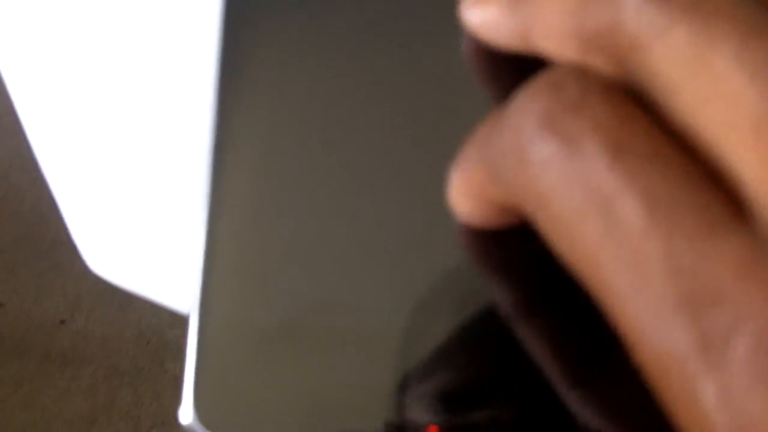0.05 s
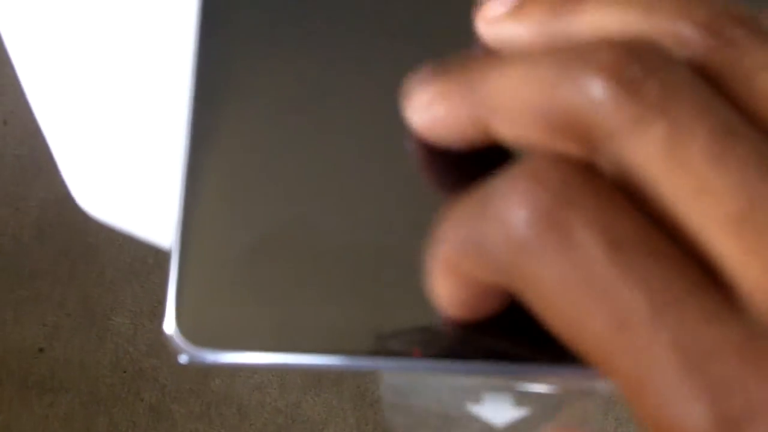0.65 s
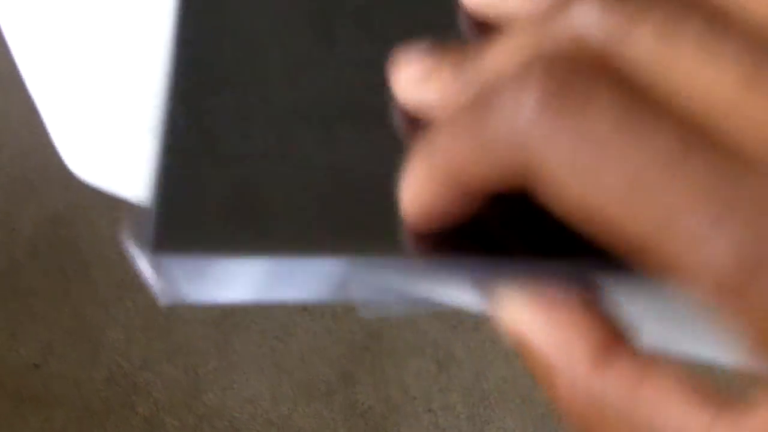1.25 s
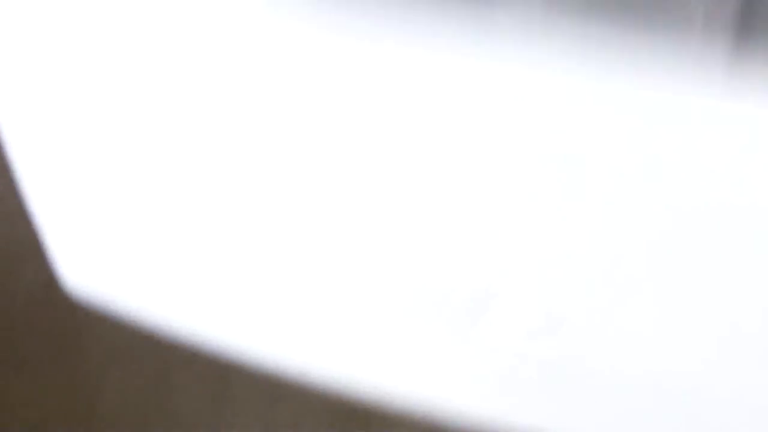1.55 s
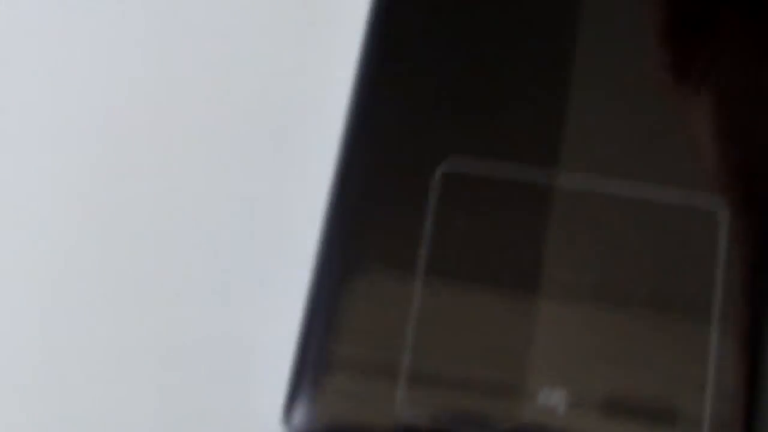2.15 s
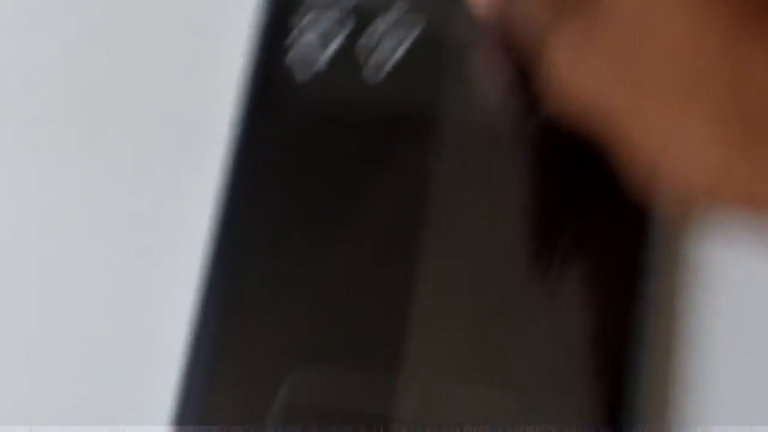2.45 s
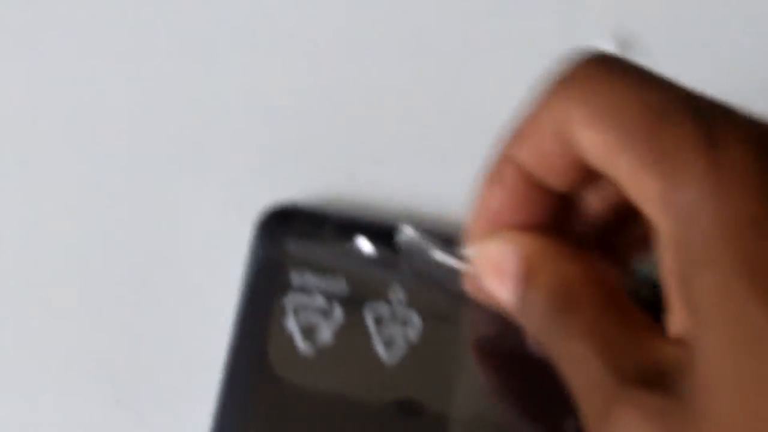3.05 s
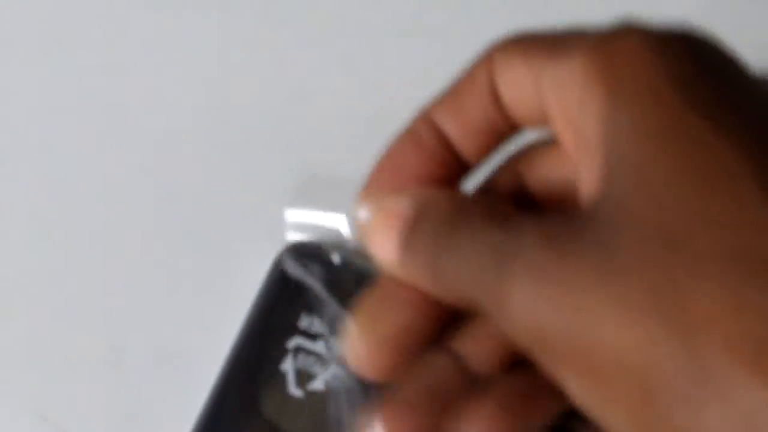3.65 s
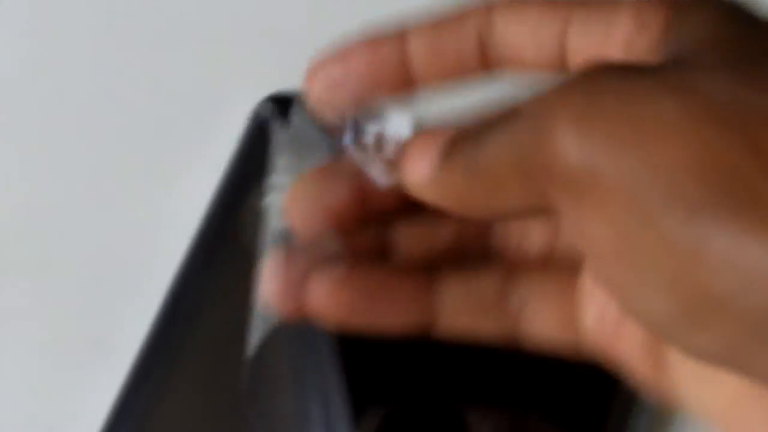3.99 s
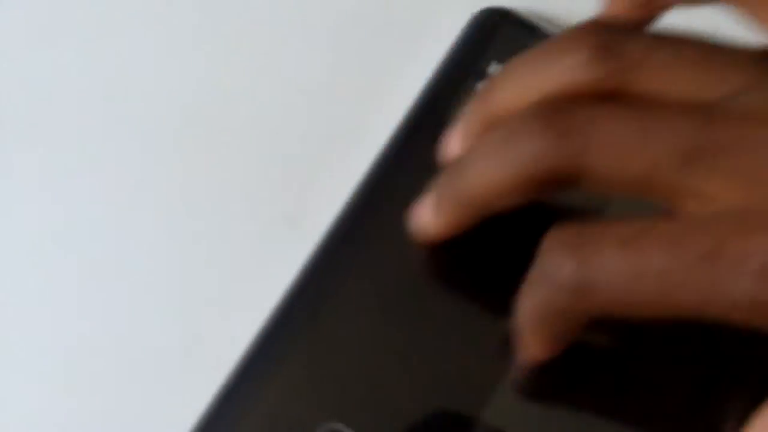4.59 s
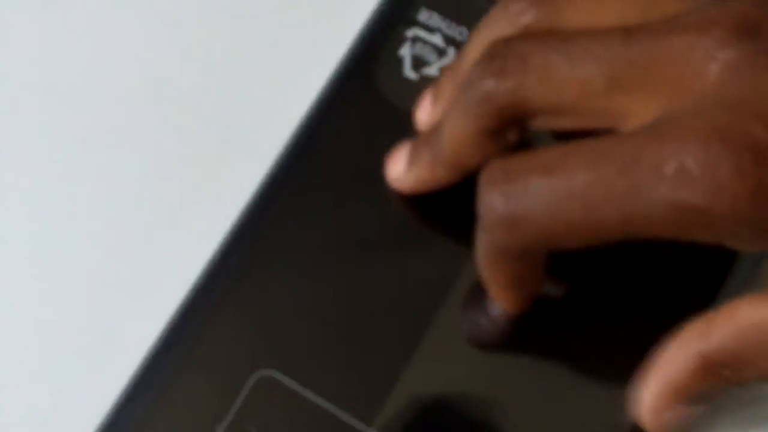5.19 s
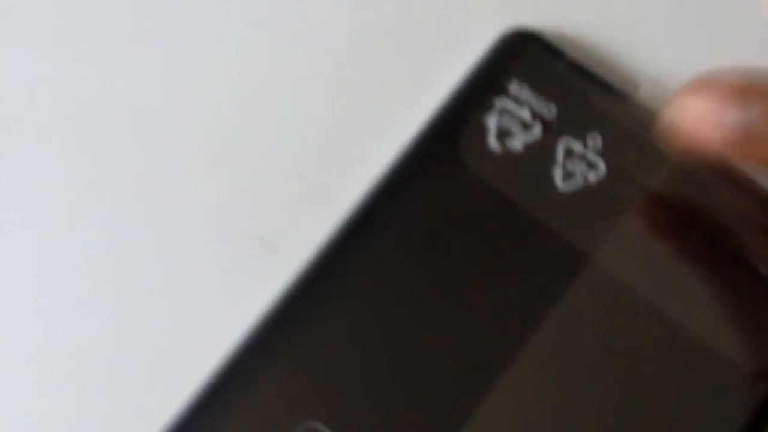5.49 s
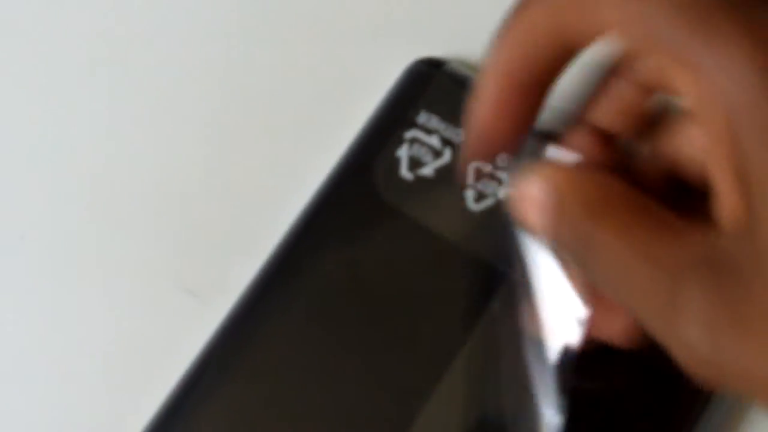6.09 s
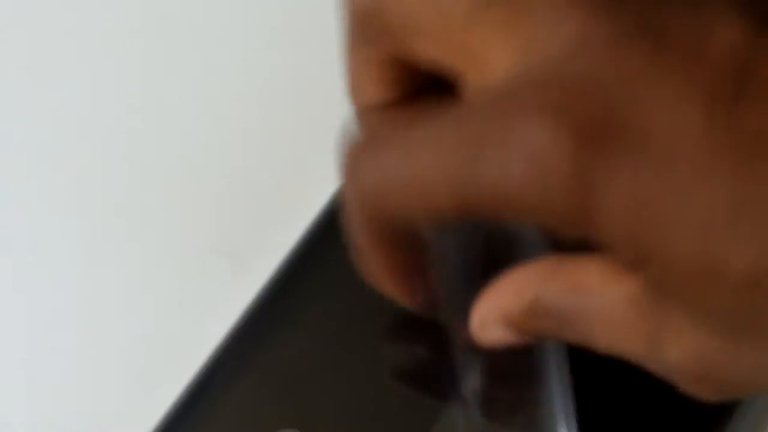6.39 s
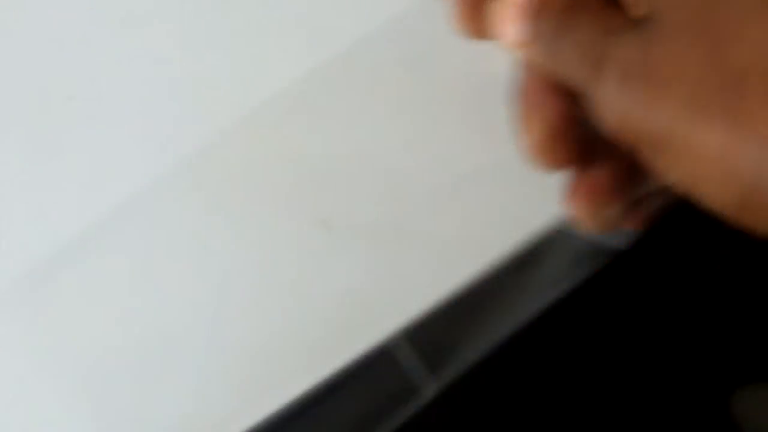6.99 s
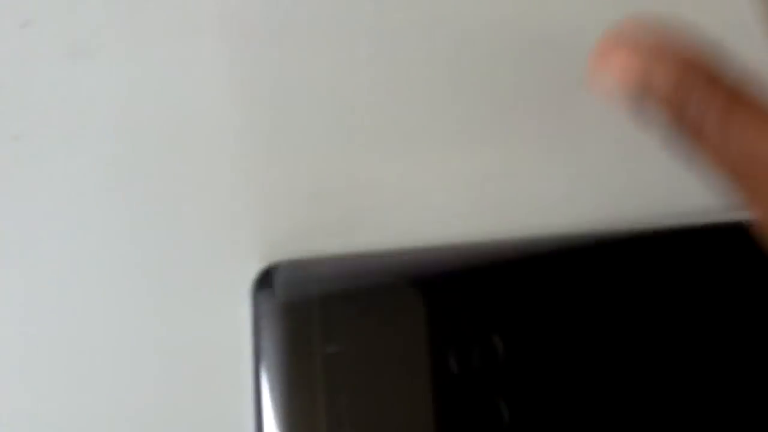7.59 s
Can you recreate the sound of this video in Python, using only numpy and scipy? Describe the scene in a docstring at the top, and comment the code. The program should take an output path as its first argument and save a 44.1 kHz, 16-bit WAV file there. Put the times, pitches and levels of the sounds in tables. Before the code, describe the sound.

Fingers brush and pick at protective plastic film on a tablet, close to a hand-held microphone in a small room. The tablet slides briefly over a table and is set down with a ringing knock. The film snaps and crackles in sharp, irregular clusters, and its tab comes free with a short dry rip. Near the end the film peels off the glass in a quick run of bright ticks, over a faint handling rumble.

```python
"""Protective film is picked and peeled off a glass-fronted tablet, close to a hand-held camera in a small room.
Over a bed of handling rumble, fingers brush and rub the film, and its creases snap as they buckle.
At 1.5 s the tablet slides over the table; at 2.2 s it is set down with a ringing knock. At 3.5 s the
pull tab rips free, then loose film scrapes over the edge between more snaps. Around 7 s the glue lets go
in runs of bright stick-slip ticks, and a few last creases crack."""
import sys
import numpy as np
from scipy import signal
from scipy.fft import rfft, irfft
from scipy.io import wavfile

SR = 44100
rng = np.random.default_rng(int(sys.argv[2]) if len(sys.argv) > 2 else 0)


def int16_out(signal):
    """Quantize to a 16-bit WAV file."""
    q = np.round(np.clip(np.atleast_2d(signal).T, -1, 1) * 32767)
    wavfile.write(sys.argv[1], SR, q.astype(np.int16))


N = 345744
TIME = np.arange(N) / SR

# EQ curves of the bed: swaying camera, skin on its case, skin grazing the film (f/Hz, level/dB)
RUMBLE_EQ = [(8, -3.5), (19, 7.5), (33, -4), (46, -11), (60, -27), (120, -62.5)]
GRIP_EQ = [(40, 1), (75, 2.5), (160, -4.5), (400, -10.5), (1300, -30), (5000, -42.5)]
HISS_EQ = [(300, -1), (1300, 0.5), (3500, -9.5), (4700, -9), (6300, 0), (9000, -10), (12500, -11),
           (14500, -27.5)]
# EQ curves of the fingers: smooth glide, crisp rustle, nail tap (f/Hz, level/dB)
BRUSH_EQ = [(3000, -34), (4800, -17), (6000, 1), (7500, 0), (9500, -9), (13000, -22)]
RUSTLE_EQ = [(3000, -19), (4700, -8), (5600, 3), (6700, 1.5), (9000, -12.5), (12500, -26.5), (15000, -23.5)]
TAP_EQ = [(250, -11.5), (700, 11), (2000, 3), (3500, -12), (6000, 0.5), (12000, -20)]
# EQ curves of the tablet: sliding, dull bump (f/Hz, level/dB)
SLIDE_EQ = [(150, -31.5), (380, -26.5), (750, -1.5), (1300, 1.5), (1800, -6.5), (2500, -13), (3500, -26),
            (6000, -25.5), (14000, -47)]
BUMP_EQ = [(40, -2.5), (110, -1.5), (190, -8.5), (370, -2), (750, -3.5), (1300, -12), (3000, -42)]
# EQ curves of the film: flexing sheet, ripping tab, cracking crease, slip click (f/Hz, level/dB)
FLEX_EQ = [(150, -9), (400, -7.5), (800, 0), (3200, -1.5), (4000, -7), (5500, -35.5)]
RIP_EQ = [(90, -3.5), (190, -14), (450, -6), (1800, -5), (4000, -11), (5600, -1), (6900, -1),
          (10500, -12.5), (15000, -19)]
CRACK_EQ = [(3500, -25), (4700, -8), (5600, 2.5), (6600, 3), (7700, -4.5), (9000, -11.5), (12000, -18),
            (15500, -31.5)]
SLIP_EQ = [(3500, -33), (4900, -22), (5900, -8.5), (6700, -9), (7500, -15), (8800, -17.5), (11000, -24),
           (15500, -32.5)]
# modes of table and tablet (f/Hz, struck level/dB, rubbed level/dB, t60/s)
TABLE_MODES = [(328, -7.5, -19, 0.18), (434.6, -16, -28.5, 0.92), (448.5, 5, -2, 0.14),
               (616, -16, 1.5, 0.22), (654, -6.5, -29.5, 0.1), (843, -5.5, -14.5, 0.053),
               (1100, -16, -9, 0.046), (1260, -28, -17, .15), (1800, -22, -7, .13),
               (2070, -15.5, -4.5, 0.079)]
# resonance of the lifted flap, held shorter or longer (t/s, f/Hz)
FLAP_TUNING = [(1.17, 2180), (2.03, 1300), (2.56, 3000), (2.9, 3080), (3.4, 1900), (4.6, 2147),
               (5.97, 3300), (6.09, 1500), (6.67, 2900), (7.18, 1780)]

# background rumble and hiss drop away briefly after some loud cracks (t/s, length/s, level change/dB)
BED_DIPS = [(3.49, 0.25, -18), (3.76, 0.49, -6), (7.044, 0.46, -10.5), (7.5, .35, -4)]
# swings of the camera (t/s, length/s, level/dB)
CAMERA_SWINGS = [(1.74, 0.28, -42), (2.2, 0.45, -34), (2.94, 0.18, -36.5)]
# fingertips pressing on the case (t/s, length/s, level/dB)
FINGER_PRESSES = [(.64, 0.079, -53), (1.44, 0.13, -46.5), (1.75, 0.13, -47.5), (2.94, 0.063, -51),
                  (5.12, 0.17, -60), (7.49, 0.023, -52)]
# fingertips gliding along the film (t/s, length/s, level/dB)
FINGER_BRUSHES = [(.003, 0.125, -59), (.37, 0.067, -61), (.615, .05, -63), (4.76, 0.17, -65.5),
                  (5.21, .09, -63), (5.36, 0.11, -60.5)]
# fingers catching on the film (t/s, length/s, rustle level/dB, flex level/dB)
FINGER_DRAGS = [(.46, 0.054, -62.5, -57.5), (.66, 0.088, -65, -69), (1.41, 0.42, -64, -58.5),
                (2.13, .18, -57.5, -54.5), (2.79, .22, -57.5, -57.5), (3.37, .086, -59, -64.5),
                (4.48, 0.18, -61, -60.5), (5.76, 0.049, -58, -59), (6.1, 0.16, -61, -64),
                (6.34, .48, -60, -53.5), (7.495, 0.076, -59.5, -51.5)]
# light fingernail taps (t/s, level/dB)
NAIL_TAPS = [(.4636, -34.5), (1.059, -47), (2.6938, -37), (3.108, -42.5), (4.439, -44), (5.051, -45.5),
             (5.166, -44.5), (6.805, -40), (7.666, -42), (7.746, -44)]
# shoves of the tablet over the table (t/s, push length/s, level/dB)
TABLET_SHOVES = [(1.434, 0.0099, -36.5), (1.536, .118, -22.5)]
# tugs that bump the tablet (t/s, level/dB)
TABLET_BUMPS = [(1.166, -26), (2.860, -21.5), (4.614, -31), (6.256, -34.5), (6.672, -23.5), (6.819, -32)]
# loose film scraping over the edge (t/s, length/s, level/dB)
EDGE_SCRAPES = [(4.032, 0.016, -38.5), (4.19, .022, -27.5), (4.329, .04, -36), (5.657, 0.051, -32.5)]
# single specks of glue letting go (t/s, level/dB)
GLUE_TICKS = [(.56, -43), (.705, -43), (2.595, -42), (3.4065, -32.5), (3.425, -32.5), (3.7453, -38),
              (4.418, -46), (5.581, -51), (7.678, -44.5)]
# creases snapping (t/s, crack level/dB, flex level/dB, nominal buckling time/ms)
CREASE_SNAPS = [(.338, -40, -41, 1), (.661, -40.5, -44, 5.3), (.7225, -42.5, -49, 1.5),
                (0.8264, -36.5, -48, 0.37), (.892, -37, -35.5, 3.8), (1.1656, -15.5, -26, 1.14),
                (1.4167, -28.5, -42.5, 0.21), (2.0294, -28.5, -33, 1.26), (2.0404, -41, -39, .5),
                (2.3474, -43, -38, 0.52), (2.5573, -25, -41.5, .18), (2.5642, -23.5, -29, 1.2),
                (2.8604, -8.5, -21, 0.98), (2.881, -19.5, -21, 0.98), (2.895, -22.5, -37, .16),
                (2.9422, -38, -49, .3), (2.9519, -28, -30.5, 0.83), (3.166, -48, -36.5, 1.45),
                (3.307, -36.5, -37, 0.98), (3.4524, -22.5, -37, .5), (3.482, -19.5, -29.5, 1.2),
                (3.554, -34.5, -35.5, 0.43), (3.5856, -36.5, -36, 0.33), (3.753, -13.5, -21.5, .43),
                (3.8173, -14, -25, 1.5), (3.8468, -18, -32, 2.9), (3.9279, -39.5, -38, 1.7),
                (3.95, -28.5, -35, 0.31), (3.9587, -31, -34, 0.25), (4.082, -26.5, -33, 0.58),
                (4.1756, -31, -36.5, 3.7), (4.6134, -15.5, -19.5, 0.92), (4.6448, -31.5, -28.5, 1.4),
                (5.811, -30.5, -35, 4.5), (5.9254, -20, -29.5, 0.12), (5.9348, -16.5, -34.5, .14),
                (5.9684, -13.5, -24, 0.22), (5.9748, -11, -29, .7), (6.0654, -39, -37.5, .51),
                (6.0935, -26.5, -27.5, 0.28), (6.1299, -12, -36.5, .3), (6.2561, -13.5, -28.5, .7),
                (6.374, -22, -32, 2.4), (6.4063, -29, -32, 2.3), (6.4853, -19, -27.5, 0.98),
                (6.4975, -18.5, -27, 2.4), (6.563, -35, -30.5, 1.6), (6.6384, -46, -31.5, 1.5),
                (6.6716, -7, -22.5, 1.2), (7.1773, -20, -28, 0.52), (7.192, -17.5, -24, 7.5),
                (7.222, -24, -26.5, 0.79), (7.3427, -37, -40, .46), (7.5185, -31.5, -32.5, .96),
                (7.5374, -38, -39, 0.8), (7.8315, -34, -31.5, 3)]
# pulls on the film, each a run of slips (t/s, length/s, starting level/dB)
FILM_PULLS = [(6.8185, .0135, -6), (6.837, .015, -15), (6.8545, .012, -18), (6.9264, .002, -17),
              (6.9764, .017, -14.5), (6.9985, .012, -17), (7.0217, .0071, -20.5), (7.0405, .0059, -19)]

SWAY_DB, GRIP_DB, GRAZE_DB = -52.5, -61, -66.5  # the bed: rumble, skin on the case, skin on the film
SHOVE_ATTACK_S, COAST_DB_PER_S = 0.049, 329.5
CREAK_DB, CREAK_S, SETTLE_DB, SETTLE_S = -24, 0.003, -14, 0.012  # lead-in and tail, relative to a snap
FLAP_Q, FLAP_DB = 3.6, 4
SLIP_HZ, SLIP_MS, SLIP_CLICK_DB = 6810, 1.2, -9.5
RELOAD_S, RELOAD_AT_DB, RELOAD_DOUBLES_DB, RELOAD_JITTER = 0.003, -16, 24.5, 0.095  # gap between slips
SAG_DB_PER_S, SLIP_SCATTER_DB = 170.5, 1
NOTCH_HZ, NOTCH_Q, TOP_HZ = 4217, 4.7, 15800
DC_OFFSET = (0.0496, 0.0153)  # left, right


def undb(db):
    """Decibels to gain."""
    return 10 ** (np.asarray(db) / 20)


def unit(x):
    """Scale to rms 1."""
    return x / np.sqrt(np.mean(x ** 2))


def eq(x, curve, size=4096):
    """Minimum-phase EQ through the curve's points, so attacks stay sharp."""
    hz, db = np.transpose(curve)
    grid = np.maximum(np.arange(size // 2 + 1) * SR / size, 1)
    cepstrum = irfft(np.log(undb(np.interp(np.log(grid), np.log(hz), db))))
    cepstrum[1:size // 2] *= 2
    cepstrum[size // 2 + 1:] = 0
    return signal.fftconvolve(x, irfft(np.exp(rfft(cepstrum))))[:len(x)]


def add(track, s, sound, db):
    """Mix in a one-shot that holds the energy of 1 ms at the given level."""
    i = int(s * SR)
    sound = sound * undb(db) * np.sqrt(SR / 1000 / np.sum(sound ** 2))
    track[i:i + len(sound)] += sound[:N - i]


def burst(ms, grit, ring_db, ring_ms, size=2048):
    """A sudden release, a quick rattle of smaller ones, and waves dying away in the sheet."""
    t_ms = np.arange(size) / SR * 1000
    rattle = grit * np.exp(-(t_ms / ms) ** 2 / 2)
    push = rng.standard_normal(size) * (rattle + undb(ring_db) * np.exp(-t_ms / ring_ms))
    push[0] += 1
    return push


def grains(per_s, spread_db):
    """Tiny random contacts, a few of them stronger than the rest."""
    gains = undb(spread_db * np.minimum(rng.exponential(size=N), 5))
    return (rng.random(N) < per_s / SR) * gains * rng.standard_normal(N)


def crackle(decay_s, spread_db=0.5, size=6144):
    """A dying shower of tiny releases."""
    gains = undb(spread_db * np.minimum(rng.exponential(size=size), 5))
    releases = rng.standard_normal(size) * gains * (rng.random(size) < 0.2)
    return releases * np.exp(-np.arange(size) / SR / decay_s)


def rasp(length_s, size=6144):
    """Countless tiny catches that start at once, hold and stop."""
    return rng.standard_normal(size) * np.exp(-(np.arange(size) / SR / length_s) ** 4)


def drift(per_s):
    """Random modulation with a spread near 1."""
    knots = rng.standard_normal(N // 100)
    return np.interp(TIME * per_s, np.arange(len(knots)), knots)


def strokes(cues, column=2):
    """Gain envelope of short hand movements, each swelling and easing off."""
    gain = np.zeros(N + SR)
    for cue in cues:
        i, n = int(cue[0] * SR), int(cue[1] * SR)
        gain[i:i + n] += undb(cue[column]) * np.sqrt(np.sin(np.pi * np.arange(n) / n))
    return gain[:N]


def dip_db():
    """Brief, rounded dips in the level of the bed at the cued times."""
    return sum(db * np.sqrt(np.maximum(1 - (2 * (TIME - s) / length - 1) ** 2, 0))
               for s, length, db in BED_DIPS)


def room(x, t60_s, wet_db, size=SR // 2):
    """Nearby surfaces answer within milliseconds and the small room dies away quickly."""
    t = np.arange(size) / SR
    onset = 1 - np.exp(-(t / 0.0023) ** 2)
    tail = rng.standard_normal(size) * np.exp(-np.log(1000) * t / t60_s) * onset
    return x + undb(wet_db) * signal.fftconvolve(x, tail / np.sqrt(np.sum(tail ** 2)))[:N]


def grazing():
    """Skin grazes the film: a faint hiss that swells, ebbs and dips with the rest of the bed."""
    swell_db = 1.3 * drift(per_s=51) + 1.6 * drift(per_s=5.2)
    hiss = unit(eq(grains(per_s=9700, spread_db=1.0), HISS_EQ))
    return hiss * undb(GRAZE_DB + 0.7 * dip_db() + swell_db)


def port_grip():
    """Each microphone port picks up a little grip noise of its own, which widens the bed."""
    sides = np.array([unit(eq(noise, GRIP_EQ)) for noise in rng.standard_normal((2, N))])
    return sides * undb(GRIP_DB - 5.5 + dip_db())


def handling():
    """The low end: the camera sways in the hand, skin rubs its case and fingertips thud softly."""
    rumble = unit(eq(rng.standard_normal(N), RUMBLE_EQ, size=32768))
    sway = undb(SWAY_DB + dip_db()) + strokes(CAMERA_SWINGS)
    grip = undb(GRIP_DB + dip_db() + 4.8 * drift(per_s=18))
    skin = unit(eq(rng.standard_normal(N), GRIP_EQ))
    return rumble * sway + skin * (grip + undb(1.0) * strokes(FINGER_PRESSES))


def brushing():
    """Dry skin gliding over the film gives a smooth, high whisper."""
    return unit(eq(rng.standard_normal(N), BRUSH_EQ)) * strokes(FINGER_BRUSHES)


def dragging(smear_s=0.00021):
    """Skin catches and slips on the film: a fine rustle on top, the shaken sheet underneath."""
    contacts = grains(per_s=2200, spread_db=3.5) * undb(3.5 * drift(per_s=61))
    energy = signal.lfilter([1], [1, -np.exp(-1 / SR / smear_s)], contacts ** 2)
    catches = rng.standard_normal(N) * np.sqrt(energy)  # each contact becomes a tiny puff of noise
    rustle = unit(eq(catches, RUSTLE_EQ)) * strokes(FINGER_DRAGS)
    body = unit(eq(catches, FLEX_EQ)) * strokes(FINGER_DRAGS, column=3)
    return rustle * undb(7.5), body * undb(1.54)


def nail_taps():
    """A fingernail touches the film where it lies flat on the glass."""
    out = np.zeros(N)
    for s, db in NAIL_TAPS:
        add(out, s, eq(burst(ms=1.5, grit=0.2, ring_db=-28.5, ring_ms=4.8), TAP_EQ), db)
    return out


def table_ring(struck):
    """Table and tablet ring after one push, voiced as struck or as rubbed."""
    t = np.arange(SR) / SR
    return sum(undb(hit_db if struck else rub_db) * np.sin(2 * np.pi * hz * t) * 1000 ** (-t / t60)
               for hz, hit_db, rub_db, t60 in TABLE_MODES)


def sliding():
    """Each shove builds up and coasts out: dense catches on the table top, partly ringing its modes."""
    force = np.zeros(N)
    for s, length, db in TABLET_SHOVES:
        attack = np.clip((TIME - s) / SHOVE_ATTACK_S, 0, 1)
        force += attack * undb(db - COAST_DB_PER_S * np.maximum(TIME - s - length, 0))
    catches = grains(per_s=3000, spread_db=1.5) * undb(2.4 * drift(per_s=150)) * force
    ring = unit(signal.fftconvolve(catches, table_ring(struck=False))[:N])
    scrape = unit(eq(catches, SLIDE_EQ)) + undb(-4) * ring
    return unit(scrape) * np.sqrt(np.mean(force ** 2)) * undb(-1.5)


def knock(at_s=2.2145):
    """The tablet's edge drops on the table: a dull blow with a ringing tail."""
    out = np.zeros(N)
    add(out, at_s, table_ring(struck=True), db=-7.5)
    add(out, at_s, eq(burst(ms=2.2, grit=0.013, ring_db=-25, ring_ms=13), BUMP_EQ), db=-9)
    return out


def scraping():
    """Loose film rasps across the tablet's edge: the sheet shakes and hisses."""
    out = np.zeros(N)
    for s, length, db in EDGE_SCRAPES:
        catches = rasp(length)
        add(out, s, eq(catches, FLEX_EQ), db)
        add(out, s, eq(catches, RUSTLE_EQ), db - 2)
    return out


def tab_rip(at_s=3.4678):
    """The pull tab's glue gives way all at once in a dry, broad rasp."""
    out = np.zeros(N)
    add(out, at_s, eq(rasp(length_s=0.0063), RIP_EQ), db=-2.5)
    return out


def flap(push, hz, ring_db):
    """A push flexes the sheet, and the lifted flap adds a hollow resonance."""
    flex = eq(push, FLEX_EQ)
    return flex + undb(ring_db) * signal.lfilter(*signal.iirpeak(hz, FLAP_Q, fs=SR), flex)


def disperse(x, hz, q):
    """Bending waves cross the sheet at different speeds: an all-pass draws each click out."""
    return x - 2 * signal.lfilter(*signal.iirpeak(hz, q, fs=SR), x)


def creases(pitch_spread=0.03):
    """Creases creak, crack, shake the sheet and settle; specks of glue tick and tugs bump the tablet."""
    top, body = np.zeros(N), np.zeros(N)
    pitches = np.exp(pitch_spread * rng.standard_normal(len(CREASE_SNAPS)))  # creases differ in size
    for (s, crack_db, flex_db, ms), pitch in zip(CREASE_SNAPS, pitches):
        crack = burst(1.3 * ms, grit=0.68 * ms, ring_db=-35, ring_ms=5.9)
        flex = burst(1.4 * ms, grit=0.5 * ms, ring_db=-18.5, ring_ms=3.6)
        creak = crackle(CREAK_S)[::-1]  # reversed, it swells into the snap
        flap_hz = np.interp(s, *np.transpose(FLAP_TUNING))
        add(top, s - len(creak) / SR, eq(creak, CRACK_EQ), crack_db + CREAK_DB)
        add(top, s, eq(crack, np.array(CRACK_EQ) * [pitch, 1]), crack_db + 1.67)
        add(top, s, eq(crackle(SETTLE_S), RUSTLE_EQ), crack_db + SETTLE_DB)
        add(body, s, flap(flex, flap_hz, FLAP_DB), flex_db + 1.02)
        add(body, s, flap(crackle(SETTLE_S), flap_hz, FLAP_DB - 4), flex_db + SETTLE_DB + 3.5)
    for s, db in GLUE_TICKS:
        add(top, s, eq(burst(ms=0.4, grit=0.3, ring_db=-28, ring_ms=3), CRACK_EQ), db)
    for s, db in TABLET_BUMPS:
        add(body, s, eq(burst(ms=0.62, grit=0.24, ring_db=-38.5, ring_ms=6.3), BUMP_EQ), db)
    return disperse(top, hz=6500, q=1.3), body


def slips(max_per_pull=12):
    """Yield (t/s, level/dB) per slip: tension sags during a pull, and big slips take longer to reload."""
    for start, length, first_db in FILM_PULLS:
        t = 0
        for late, strong in rng.standard_normal((max_per_pull, 2)):
            db = first_db - SAG_DB_PER_S * t
            if t < length:
                yield start + t, db + SLIP_SCATTER_DB * strong
            t += RELOAD_S * 2 ** ((db - RELOAD_AT_DB) / RELOAD_DOUBLES_DB) * np.exp(RELOAD_JITTER * late)


def chirp(hz, ms, glide=0.19):
    """A few cycles of bending wave, falling in pitch because the shorter waves arrive first."""
    n = int(ms * SR / 1000)
    falling_hz = hz * (1 + glide * np.linspace(1, -1, n))
    return np.hanning(n) * np.sin(2 * np.pi * np.cumsum(falling_hz) / SR)


def peeling():
    """The taut film jumps off the glass in short, clean slips that barely shake the sheet."""
    top, body = np.zeros(N), np.zeros(N)
    for s, db in slips():
        ping = chirp(SLIP_HZ * (1 + 0.031 * rng.standard_normal()), SLIP_MS)
        click = burst(ms=0.12, grit=0.58, ring_db=-20.5, ring_ms=4)
        flex = burst(ms=1.0, grit=0.27, ring_db=-15, ring_ms=7.6)
        add(top, s, ping, db - 0.3)
        add(top, s, eq(click, SLIP_EQ), db + SLIP_CLICK_DB)
        add(body, s, eq(flex, FLEX_EQ), -29 + 0.33 * db)
    return top, body


def scene():
    """Bright layers stay nearly dry, body layers get more room; the left port hears it a sample late."""
    cracks, crease_body = creases()
    rustle, drag_body = dragging()
    mix = room(sliding() + knock(), t60_s=0.22, wet_db=-8.5) + handling() + grazing()
    mix += room(cracks + rustle + brushing(), t60_s=0.25, wet_db=-15)
    grip = port_grip()
    mix += room(crease_body + drag_body + nail_taps() + scraping(), t60_s=0.23, wet_db=-8.5)
    mix += room(tab_rip(), t60_s=0.22, wet_db=-17.5)
    ticks, peel_body = peeling()
    mix += room(ticks, t60_s=0.24, wet_db=-20.5) + room(peel_body, t60_s=0.24, wet_db=-9.5)
    left = np.append(0, mix[:-1])
    return np.array([left, mix]) + grip


def record(dry):
    """The microphone duct notches a narrow band; the recorder cuts the top, adds DC and clips."""
    notched = signal.lfilter(*signal.iirnotch(NOTCH_HZ, NOTCH_Q, fs=SR), dry)
    high_cut = signal.ellip(8, 0.2, 70, TOP_HZ, fs=SR, output="sos")
    return np.clip(signal.sosfilt(high_cut, notched) + np.array(DC_OFFSET)[:, None], -1, 1)


dry = scene()
out = record(dry)
int16_out(out)
```